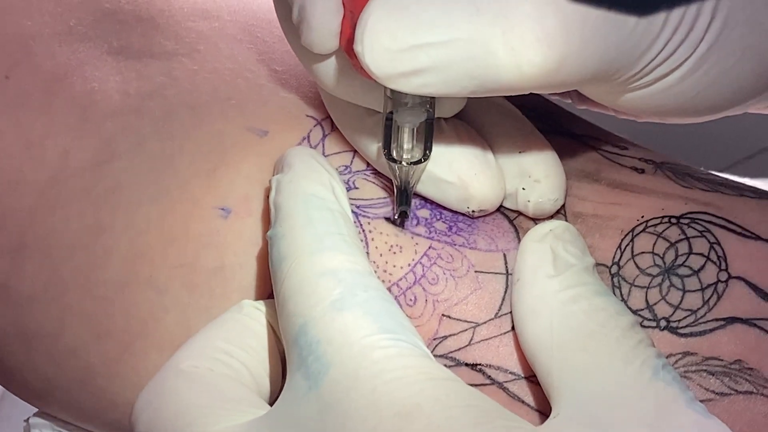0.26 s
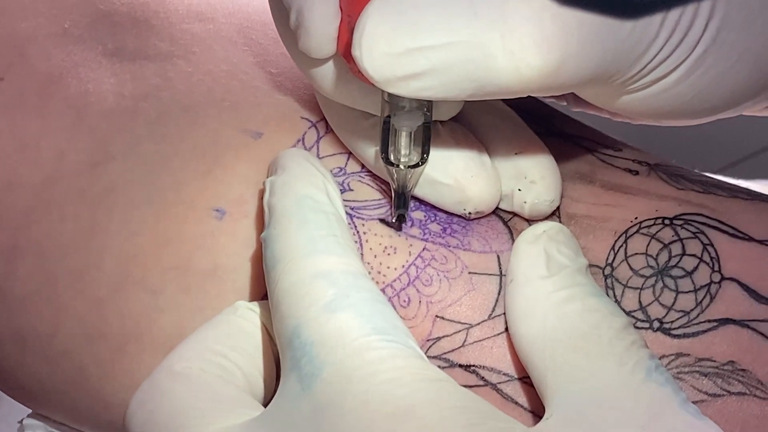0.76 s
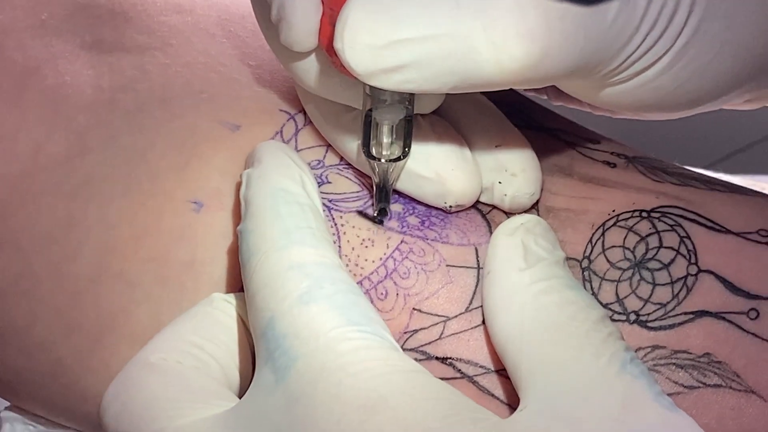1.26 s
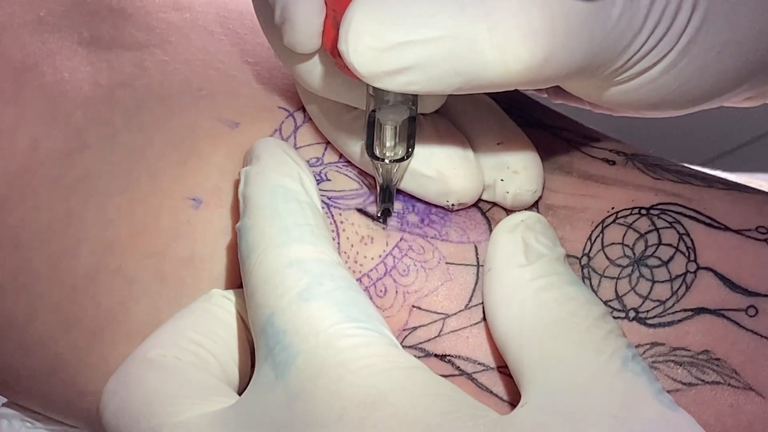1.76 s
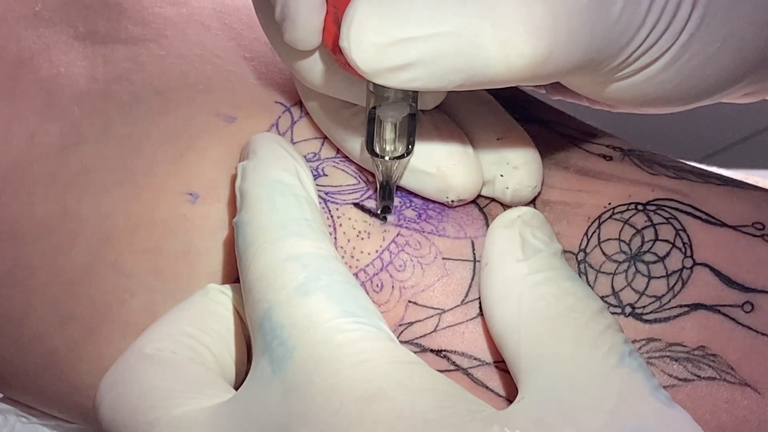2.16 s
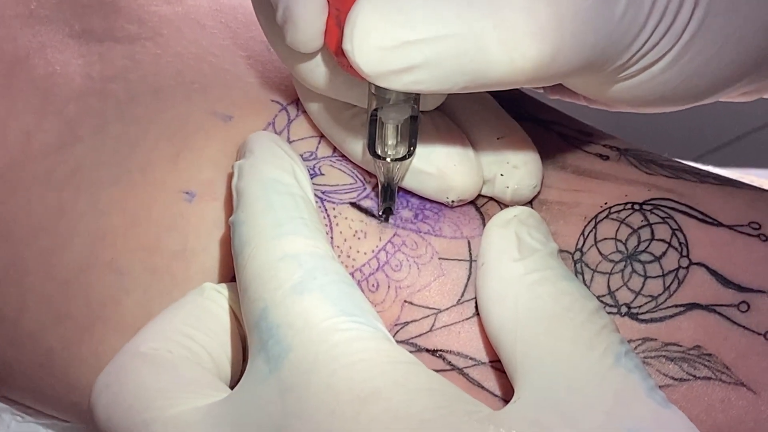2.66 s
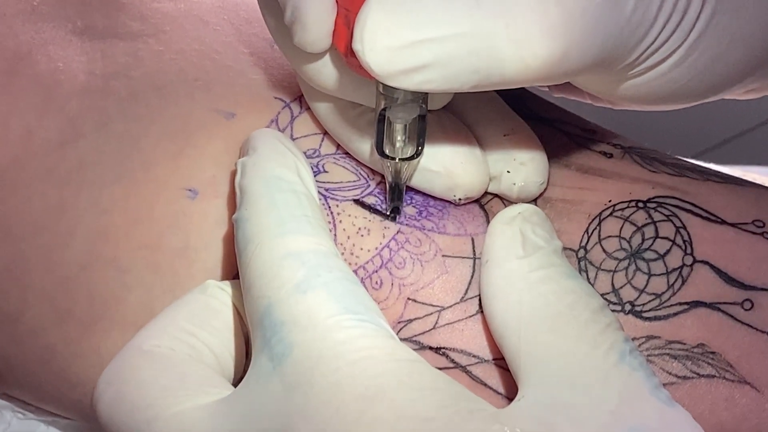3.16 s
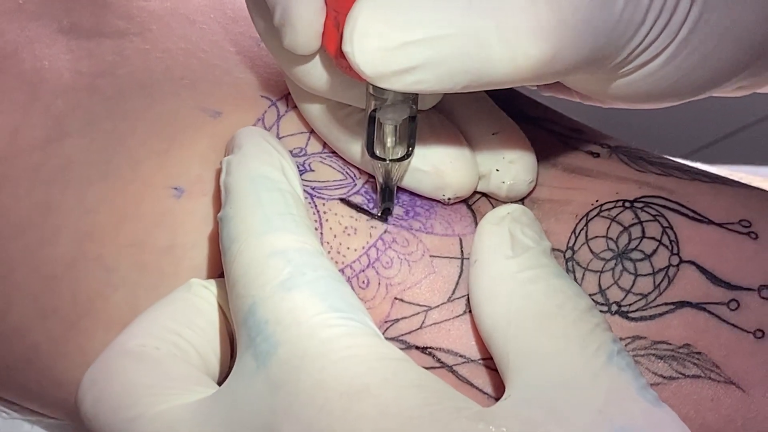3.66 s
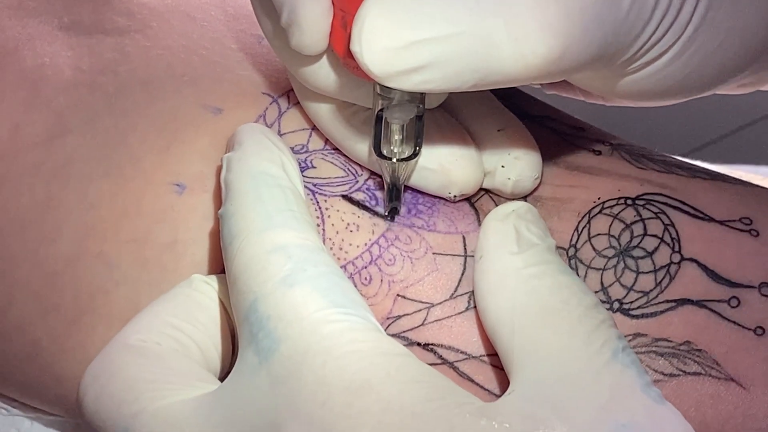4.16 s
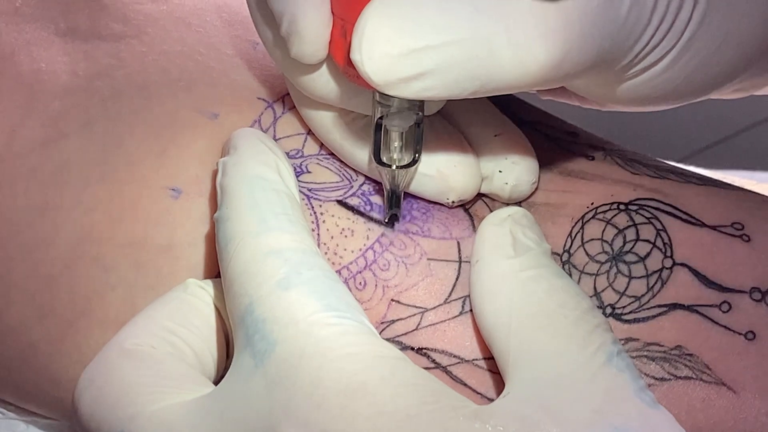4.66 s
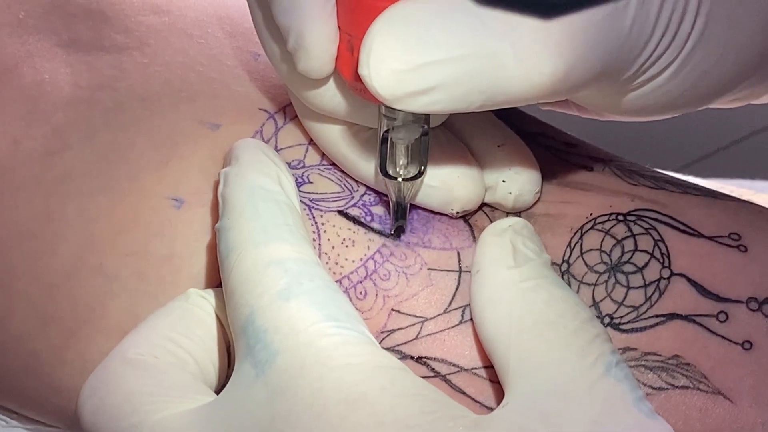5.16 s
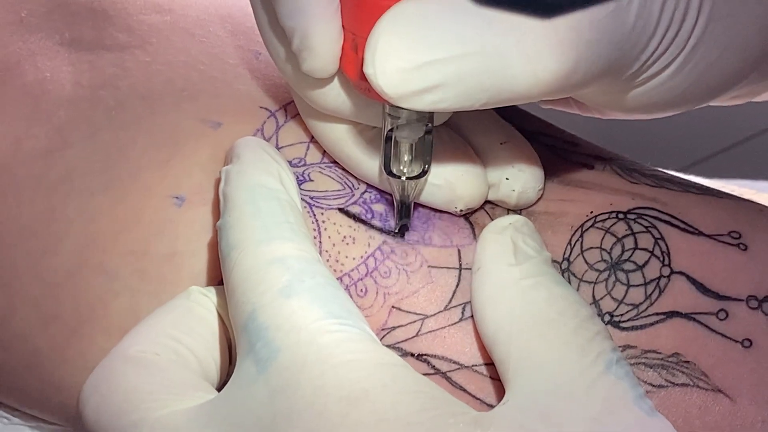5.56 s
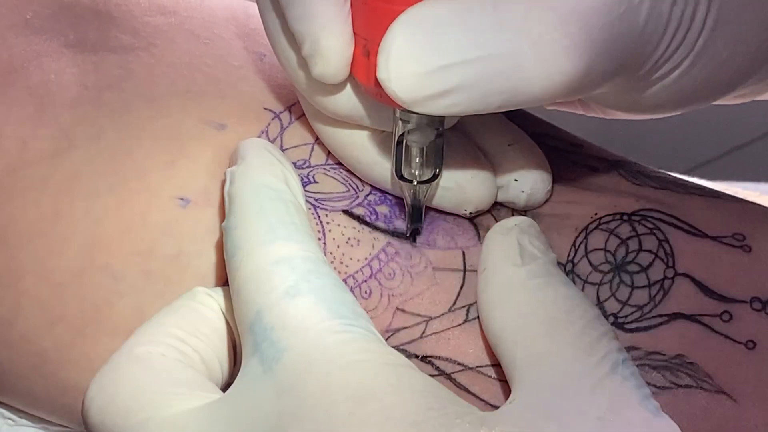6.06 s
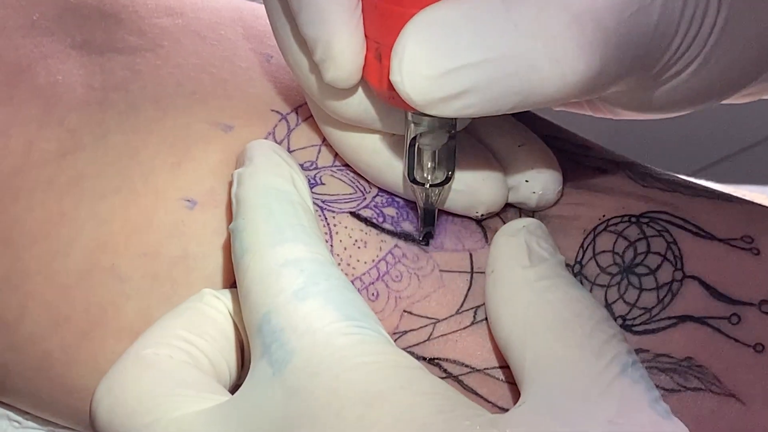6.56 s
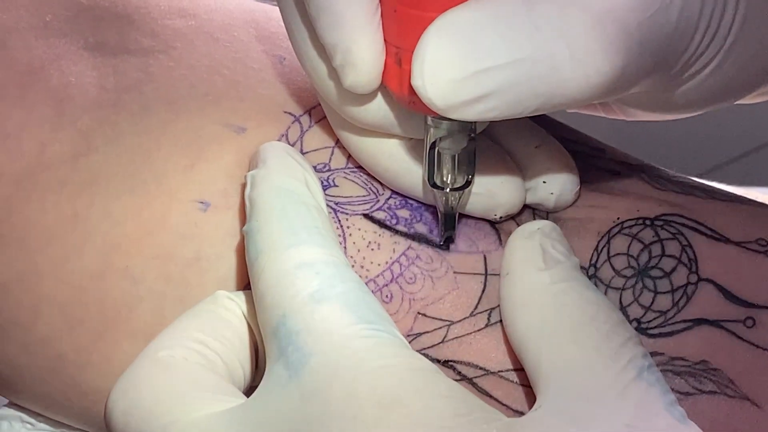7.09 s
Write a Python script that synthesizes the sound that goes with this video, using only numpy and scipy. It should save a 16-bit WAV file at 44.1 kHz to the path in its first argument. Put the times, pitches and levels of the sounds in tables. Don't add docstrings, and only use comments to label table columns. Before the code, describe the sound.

From 0 s a rotary tattoo machine is already running close to a stereo phone microphone in a quiet, fairly dry room. About 84 needle strikes a second merge into a continuous raspy buzz, with bright sizzling highs, a nasal metallic ring around the middle and a weak low hum. In the first 1.6 s it runs almost free: crisp, sharp ticks of uneven strength, with short softer patches near 1.0-1.3 s and brief hum dropouts. From about 2 to 4 s the speed sinks very slightly as the needle works in. Around 4-6 s strikes are softer, with in-between knocks making the buzz denser and rougher. Faint dull glove or arm thuds occur near 4.6 and 5.3 s, mostly buried. After 6 s the load eases a little, with a few harder ticks before 7.3 s. A very quiet low room rumble swells beneath throughout.

```python
import sys
import numpy as np
from scipy import signal
from scipy.fft import rfft, irfft, next_fast_len
from scipy.io import wavfile
from scipy.ndimage import uniform_filter1d

SR = 44100
rng = np.random.default_rng(int(sys.argv[2]) if len(sys.argv) > 2 else 0)


def dump(signal):
    limited = np.clip(np.atleast_2d(signal).T, -1, 1)
    pcm = np.round(limited * 32767).astype(np.int16)
    wavfile.write(sys.argv[1], SR, pcm)


def attenuation_scalar(level_db):
    decades = np.asarray(level_db, float) / 20
    return 10 ** decades


N = 323253
SIZE = next_fast_len(N + SR // 2)
TIME, FREQ = np.arange(N) / SR, np.arange(SIZE // 2 + 1) * SR / SIZE


def unit(x):
    return x / np.sqrt(np.mean(x ** 2))


def curve(table, at):
    return np.interp(at, *np.transpose(table))


def walk(rate):
    hold = int(SR / rate)
    steps = np.repeat(rng.standard_normal(N // hold + 1), hold)
    return 1.4 * uniform_filter1d(uniform_filter1d(steps, hold), hold)[:N]


def smear(x, ms):
    return signal.lfilter([1], [1, -np.exp(-1000 / (max(ms, .02) * SR))], x)


def by_load(rule, load):
    return np.interp(load, [0, rule[2]], rule[:2])


def bumps(table, at, order=2):
    return sum(row[order] * np.exp(-(2 * (at - row[0]) / row[1]) ** 2) for row in table)


# (frequency [Hz], density [dB per Hz])
FLOOR_SPECTRUM = [(15, -50), (28, -20), (65, -0.5), (118, -9), (162, -1.5), (187, -13), (215, -11),
                  (357, -12.5), (776, -14.5), (939, -19), (1100, -3), (1430, -36), (2420, -120)]
# (time [s], length [s], level below 130 Hz [dB], level above [dB])
SWELLS = [
    (.5, 1.2, -2.5, 3.5),
    (2.6, 3.1, 2, 5),
    (3.45, 0.38, 4.5, 0),
    (4.25, .6, 2, -3.5),
    (4.63, .08, 2, 7.5),
    (6.1, 0.14, 2, 0),
    (7.15, 0.51, .5, 4),
]


def room_floor():
    out = 0
    low_db, high_db = bumps(SWELLS, TIME), bumps(SWELLS, TIME, order=3)
    spectrum_hz, spectrum_db = np.transpose(FLOOR_SPECTRUM)
    for hz in 30 * 2 ** np.arange(0, 5.4, .5):
        band = signal.butter(2, [hz / 1.19, hz * 1.19], "band", fs=SR, output="sos")
        mid, side = signal.sosfilt(band, rng.standard_normal((2, N)))
        swell_db = low_db if hz < 130 else high_db
        db = np.interp(np.log(hz), np.log(spectrum_hz), spectrum_db) + swell_db + 1.6 * walk(5.5)
        side_share = np.clip(.36 + hz / 1800, 0, 1)
        out = out + attenuation_scalar(db) * (mid + side_share * side * np.array([[1], [-1]]))
    return unit(out) * attenuation_scalar(-67.5 + np.array([[.8], [-.8]]))


def room(x):
    t60_s, level_db = .2, -19
    t = np.arange(SR // 3) / SR
    decay = np.exp(-np.log(1000) * t / t60_s) * (t > .002)
    tail = rng.standard_normal((2, len(t))) * decay
    tail /= np.sqrt(np.sum(tail ** 2) / 2)
    return attenuation_scalar(level_db) * signal.fftconvolve(x, tail, axes=1)[:, :N]


# (time [s], peak level [dB], frequency just above the band [Hz]
THUDS = [
    (4.607, -72, 463),
    (5.308, -69, 220),
]


def thuds(decay_s=0.029):
    out = np.zeros(N)
    t = np.arange(SR // 8) / SR
    for s, peak_db, hz in THUDS:
        band = signal.butter(1, [hz / 1.3, hz * 0.8], "band", fs=SR, output="sos")
        burst = unit(signal.sosfilt(band, rng.standard_normal(len(t))))
        start = int(s * SR)
        out[start:start + len(t)] += attenuation_scalar(peak_db + 6) * burst * np.exp(-t / decay_s)
    return out


# (time [s], speed [turns per s])
SPEED = [(0, 83.953), (0.4, 84.093), (1.0, 83.788), (1.3, 83.978), (2.1, 83.399), (2.7, 83.508),
         (3.4, 83.176), (4, 82.799), (4.9, 82.156), (5.7, 82.15), (6.4, 82.447), (7.33, 82.61)]


def shaft():
    start_turn, free_hz, drag_hz = -.36, 84., 1.8
    speed = curve(SPEED, TIME)
    return start_turn + np.cumsum(speed) / SR, (free_hz - speed) / drag_hz


# (multiple of shaft rate [1], level [dB])
HUM_ORDERS = [(3, 0), (5, -4), (6, -5), (8, -7)]
# (time [s], length [s], level [dB])
HUM_DIPS = [
    (.16, 0.13, -15),
    (.41, .07, -15),
    (.6, .12, -3),
    (.79, 0.066, -17),
    (1.18, .12, -7),
    (1.53, 0.086, -5),
    (2.82, .08, -3),
    (4.3, 0.14, -4),
    (7.03, .08, -8),
]


def hum(angle, load):
    once_db = by_load((-12, -7.5, 0.7), load) + 2.7 * walk(7)
    lines = np.sin(4 * np.pi * angle) + attenuation_scalar(once_db) * np.sin(2 * np.pi * angle + 1)
    for k, db in HUM_ORDERS:
        lines += attenuation_scalar(-15 + db + 2 * walk(3.18)) * np.sin(2 * np.pi * k * angle)
    twice_db = by_load((-69.5, -68.5, 0.3), load) + bumps(HUM_DIPS, TIME)
    port_db = np.array([[.6], [-.6]])
    return np.sqrt(2) * attenuation_scalar(twice_db + 0.4 * walk(16) + port_db) * lines


# (time [s], peak level [dB])
HARD = [(0.396, -18), (0.4788, -16), (0.5387, -18), (0.7891, -16), (0.9318, -16), (1.1822, -17),
        (1.3848, -16), (1.504, -17), (1.7305, -18), (1.8262, -17), (1.8861, -17), (2.138, -18),
        (2.2822, -16), (2.6414, -18), (2.8923, -18), (3.0724, -18), (3.1692, -16), (3.2405, -18),
        (3.3852, -17), (3.6257, -19), (3.71, -16), (3.8187, -18), (4.0716, -19), (4.2782, -21),
        (4.3874, -21), (4.9696, -18), (6.8892, -19), (7.1926, -19)]
# (time [s], length [s], level [dB])
SLACK = [
    (0.55, 0.058, -2.5),
    (1.0, 0.12, -3),
    (1.13, 0.15, -5),
    (1.27, 0.079, -5.5),
    (1.59, 0.057, -3),
    (3.01, 0.027, -2),
    (5.42, 0.039, -7),
]


def knock_times(angle, load):
    jitter_turn, recoil, hard_above_db = .016, .5, -21.5
    wander_db, wander_per_s = 1.3, 40
    turn = np.arange(np.ceil(angle[0]), angle[-1])
    at = np.interp(turn, angle, TIME)
    load = np.interp(at, TIME, load)
    place = np.array([0 * at, .14 + 0 * at, .465 + 0 * at, by_load((.62, .81, 0.84), load)])
    chance = np.clip(rng.standard_normal((len(turn), 8)).T, -2.5, 1.5)
    place += jitter_turn * chance[:4] * np.array([[1], [1.5], [2], [1.5]]) - .03
    blow = np.minimum(chance[4:] - recoil * np.roll(chance[4:], 1, axis=1), 1)
    spread_db = by_load((2.6, 3.4, .6), load) * blow * np.array([[1], [1.6], [1.4], [1.6]])
    wander = np.interp(at, TIME, walk(wander_per_s))
    spread_db += np.minimum(wander_db * wander, wander_db)
    slack_db = bumps(SLACK, at)
    force_db = by_load((3, -2.5, .8), load) + slack_db
    free = np.ones_like(place)
    for s, peak_db in HARD:
        k = np.argmin(abs(at - s))
        force_db[k], free[0, k] = peak_db - hard_above_db, 0
        place[0, k] = np.interp(s, TIME, angle) - turn[k]
    rebound_db, half_db, late_db = (-6, -6, .8), (-13, 0.5, .6), (0.5, 0, .9)
    weaker_db = [by_load(rule, load) + .5 * slack_db for rule in (rebound_db, half_db, late_db)]
    return np.interp(turn + place, angle, TIME), force_db, np.array([0 * at] + weaker_db), spread_db, free


# (frequency [Hz], level difference [dB])
PORT_DB = [(60, 1.0), (110, 1.0), (200, 1.5), (380, 1.0), (700, 3.6), (1290, 11.0), (2380, 11.5),
           (4400, 2.0), (8120, 0.03), (15000, 0.1)]
# (frequency [Hz], phase lead [rad])
PORT_LEAD = [(0, 0), (780, -0.2), (1120, -0.2), (1460, 4.2), (1810, 5.1), (2150, 4.2), (2840, 8.6),
             (4220, 6.0), (5080, 10.0), (5940, 8.5), (6800, 6.3), (11600, -0.4), (15600, -6.0),
             (16700, -6.3)]
# (frequency [Hz], likeness [0-1])
PORT_ALIKE = [(900, .55), (1750, .82), (2400, .45), (3900, .75), (4700, .4), (5800, .65), (7000, .78),
              (8500, .95)]


def two_ports(left, other):
    alike = curve(PORT_ALIKE, FREQ)
    right = alike * left + np.sqrt(1 - alike ** 2) * other
    right *= attenuation_scalar(-curve(PORT_DB, FREQ)) * np.exp(-1j * curve(PORT_LEAD, FREQ))
    return np.array([left, right])


def part(knocks, modes, drive):
    at, force_db, weaker_db, spread_db, free = knocks
    (lead_ms, rise_ms, decay_ms, click_db, share, own_db, rub_db), weak_db = drive
    own = np.clip(rng.standard_normal(at.T.shape).T, -3, 1)
    scatter_db = np.sqrt(share) * spread_db + own_db * own
    size_db = weaker_db + np.array([0, *weak_db])[:, None] + free * scatter_db
    size_db[0] += share * force_db
    sample = ((at.ravel() - lead_ms / 1000).clip(0) * SR).astype(int)
    blows = np.bincount(sample, attenuation_scalar(size_db.ravel()), N)[:N]
    tail = smear(smear(blows, rise_ms), decay_ms)
    rattle = unit(tail) + attenuation_scalar(rub_db + 2 * walk(40))
    click = attenuation_scalar(click_db) * blows / np.sqrt(np.mean(blows ** 2) * decay_ms * SR / 2000)
    contacts = rattle * np.sign(rng.standard_normal((2, N))) + click * np.array([[1], [0]])
    left, other = rfft(contacts, SIZE)
    ring = 0
    for k, (hz, width_hz, db) in enumerate(modes):
        detuning = (FREQ - hz ** 2 / (FREQ + 1)) / (1.627 * width_hz)
        ring = ring + (-1) ** k * attenuation_scalar(db) / (1 + 1j * detuning) ** 2
    return irfft(ring * two_ports(left, other), SIZE)[:, :N]


# (frequency [Hz], width [Hz], level [dB])
GRIP = [(1171, 56, -41), (1447, 24, -37), (1725, 228, -28.5), (2935, 540, -45.5), (3785, 580, -41.5)]
TUBE = [(5080, 1360, -41), (5744, 570, -31), (6770, 1370, -39)]
TIP = [(8560, 970, -30.5), (9910, 737, -28), (11500, 1350, -34.5)]
EDGE = [(12450, 1400, -28.5), (15630, 480, -32.5), (13960, 1300, -30)]
# (rebound [dB], half-turn [dB], late [dB])
GRIP_DRIVE = (1.6, 1.3, 1.9, -20, .1, .2, -7), (4, -10, -3)
TUBE_DRIVE = (.6, .05, 2.2, -4, .25, .4, -8), (-5, -10, -7)
TIP_DRIVE = (.2, .08, 1.3, -10, .55, .7, -12), (-1, -2.5, -2.5)
EDGE_DRIVE = (.15, .15, .48, -7, .95, 1.6, -18), (-7, -8, -10)


def machine(angle, load):
    knocks = knock_times(angle, load)
    body = part(knocks, GRIP, GRIP_DRIVE) + part(knocks, TUBE, TUBE_DRIVE)
    return body + part(knocks, TIP, TIP_DRIVE) + part(knocks, EDGE, EDGE_DRIVE)


def scene():
    angle, load = shaft()
    knocking = machine(angle, load)
    return room_floor() + thuds() + hum(angle, load) + room(knocking) + knocking


def roll_off(x):
    return signal.sosfilt(signal.butter(12, 17140, fs=SR, output="sos"), x)


def record(dry):
    low_pass = signal.ellip(10, .1, 22, 15870, fs=SR, output="sos")
    cut = signal.sosfiltfilt(low_pass, dry)
    return roll_off(cut)


dry = scene()
out = record(dry)
dump(out)
```